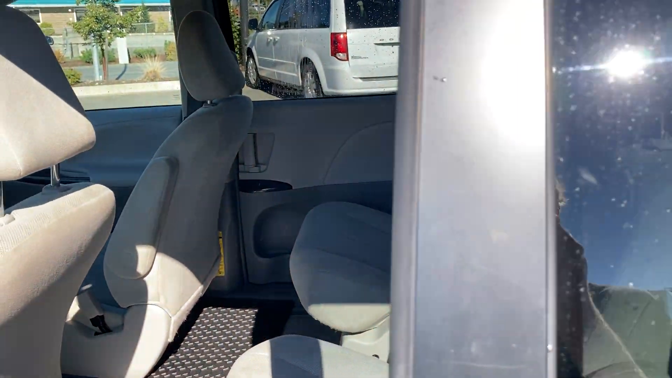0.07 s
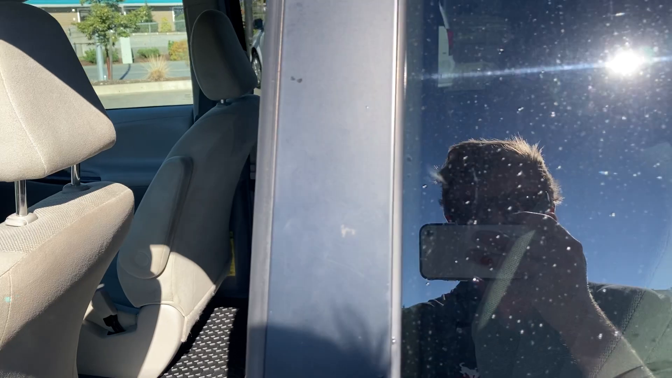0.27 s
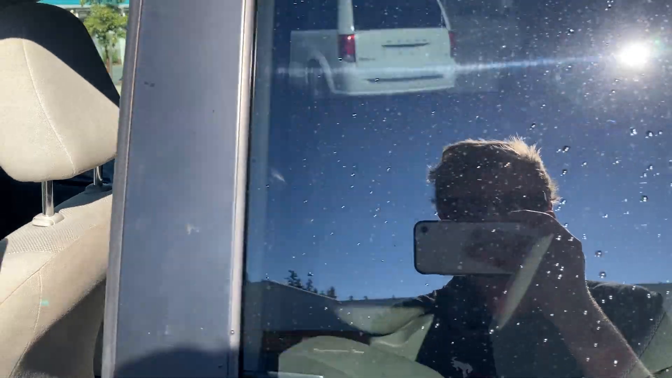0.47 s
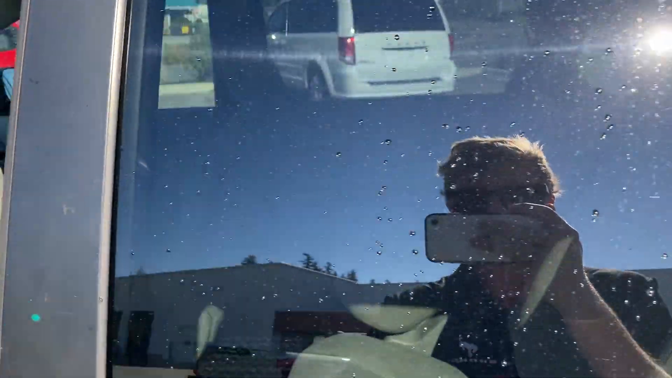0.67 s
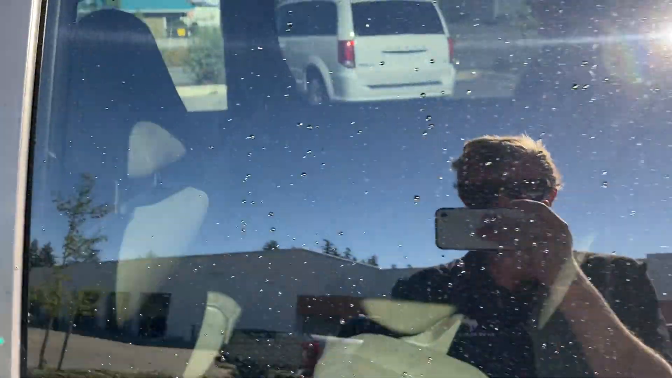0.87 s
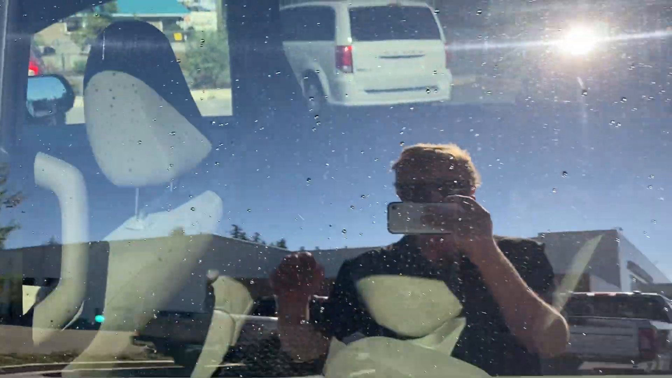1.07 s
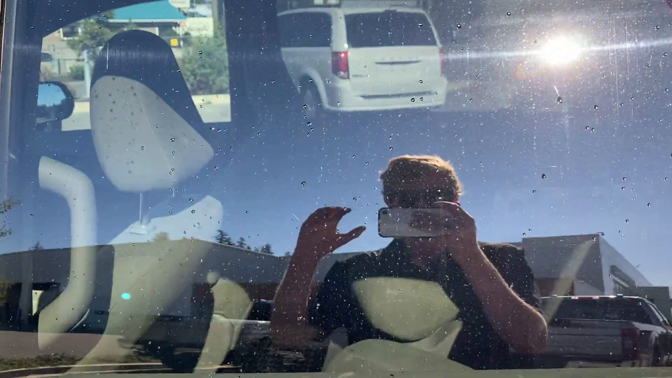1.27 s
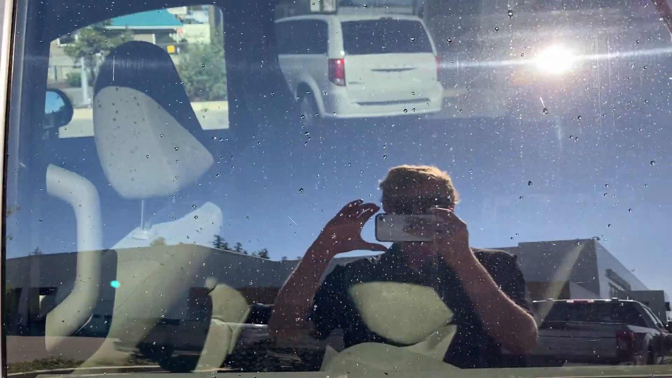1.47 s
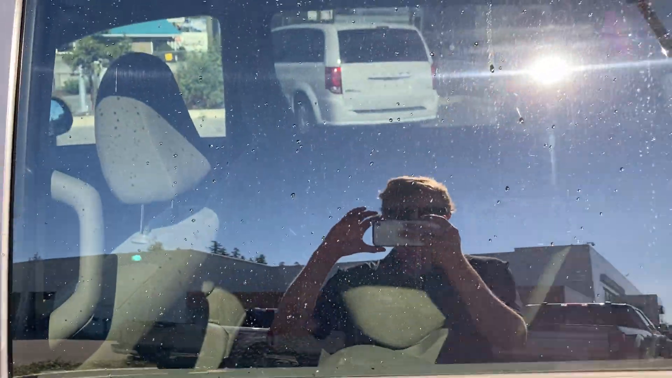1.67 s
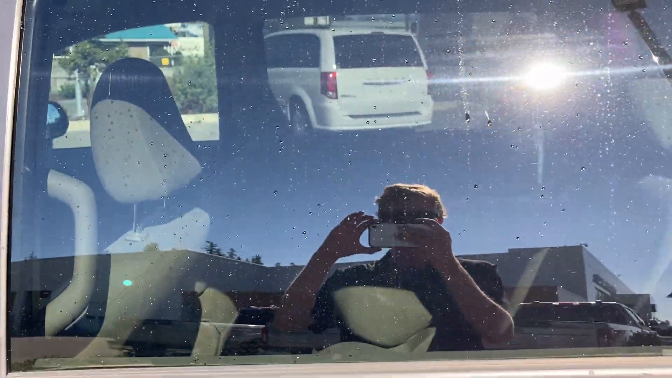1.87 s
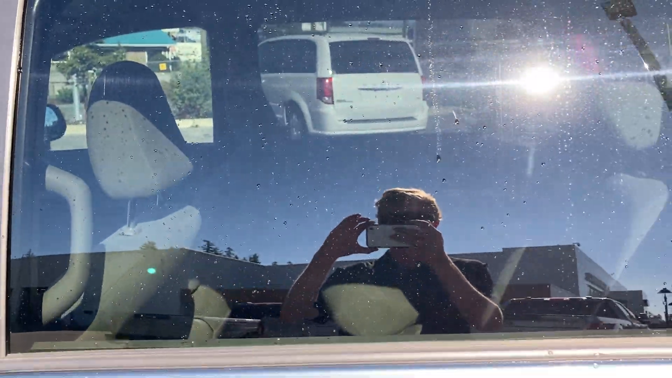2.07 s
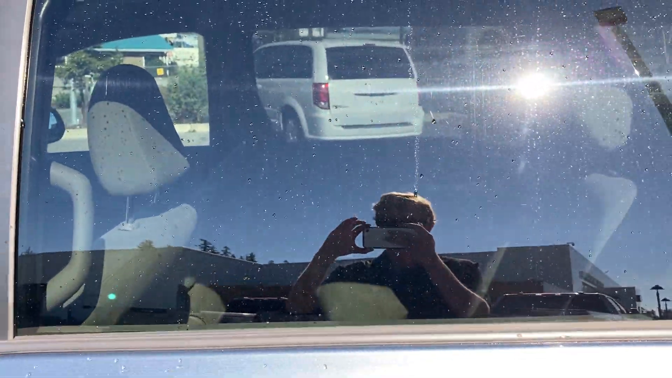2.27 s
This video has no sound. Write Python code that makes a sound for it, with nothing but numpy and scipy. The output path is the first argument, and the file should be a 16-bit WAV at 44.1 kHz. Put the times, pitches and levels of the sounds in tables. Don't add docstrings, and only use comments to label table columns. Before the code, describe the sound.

Close up outside a parked van, the sliding door rumbles and scrapes, jolts over track joints, then shuts in a loud multi-hit slam; a brief low ring dies away, leaving quiet engine and traffic hum.

```python
import sys
import numpy as np
from scipy import signal
from scipy.fft import rfft, irfft, next_fast_len
from scipy.io import wavfile
from scipy.ndimage import uniform_filter1d, map_coordinates

SR = 44100
rng = np.random.default_rng(int(sys.argv[2]) if len(sys.argv) > 2 else 0)


def waveform_to_disk(signal):
    frames = np.transpose(np.atleast_2d(signal))
    scaled = np.clip(frames, -1, 1) * 32767
    samples = np.round(scaled).astype(np.int16)
    wavfile.write(sys.argv[1], SR, samples)


def rack_gain(trim_db):
    fader = np.asarray(trim_db, float)
    return 10 ** (fader / 20)


N = 101430
T = np.arange(N) / SR

# t/s, rolling level/dB, scrape over the mean rolling level/dB
ROLL_PATH = [
    (0, -27.5, -1),
    (.14, -27.5, -1.5),
    (.27, -24.5, 1),
    (.4, -27, -0.5),
    (.6, -23.5, 0),
    (.72, -23, 0),
    (.88, -23.5, 4),
    (1.001, -22, 0.5),
    (1.11, -25, 3.5),
]
# f/Hz, level per Hz/dB
TRACK_COLOUR = [(15, -34.5), (25, -24.5), (59, -5.5), (270, -4.5), (405, -6), (1160, -24.5), (5730, -48),
                (7510, -49), (16000, -58.5)]
# f/Hz, width/Hz, gain/dB
PANEL_MODES = [(67.7, 18.6, 6), (100.8, 25, 4.5), (217.6, 77, 5.5), (266, 21, 5.5), (410, 18, 10.5),
               (583, 63, 5), (1350, 480, 3)]
# f/Hz, width/Hz, gain/dB
WHINE_MODES = [(1280, 69, 17), (1526, 120, 13)]
# f/Hz, level per Hz/dB
HUM_COLOUR = [(15, -53.5), (25, -26.5), (49, 2.5), (97, -1.5), (206, -4.5), (270, -10), (775, -11),
              (4740, -35.5), (16000, -70)]
# f/Hz, width/Hz, gain/dB
HUM_MODES = [(207.6, 38, 5), (833, 160, 8.5), (1340, 200, 8.5), (2030, 180, 5.5)]
# t/s, peak level/dB, tilt per octave/dB, t60/s
CATCH_TICKS = [
    (.294, -45.5, -7.5, 0.032),
    (0.7579, -45.5, -3, 0.013),
    (0.8462, -30.5, -7, 0.031),
    (0.957, -46, 8.5, 0.08),
    (1.1046, -53, -9.5, .03),
    (1.117, -41.5, 0, .03),
    (1.2574, -47, 7.5, .04),
]
# f/Hz, level/dB
CATCH_COLOUR = [(1200, -22), (2500, -9), (4000, -4), (5500, -8), (7400, 0), (9500, -4), (11500, -5),
                (15500, -10)]
# t/s, level/dB, ring f/Hz
JOINT_BUMPS = [
    (0.398, -15, 277),
    (0.604, -9.5, 110),
    (0.689, -22, 397),
    (0.8, -16.5, 272),
    (0.908, -7.5, 271),
    (.965, -6, 301),
    (1.058, -10.5, 292.5),
    (.96, -20, 640),
    (1.012, -21.5, 676),
    (1.04, -32, 600),
]
# t/s, clatter level/dB, tilt per octave/dB, t60/s
LATCH_STRIKES = [(.843, -36, -6, .05), (0.9556, -32, -8.5, .08), (1.140, -30.5, -9, .06),
                 (1.147, -13, -11, 0.08), (1.167, -16.5, 3.5, 0.036), (1.1716, -15, 2, 0.029),
                 (1.176, -16.5, -8.5, .06), (1.184, -22, -0.5, .05), (1.188, -15, 3, 0.06),
                 (1.2119, -12, -7.5, 0.042), (1.232, -27.5, -7.5, 0.2)]
# f/Hz, width/Hz, gain/dB
LATCH_MODES = [(664, 150, 10), (1004, 300, 13), (4540, 180, 4), (1390, 370, 12.5), (2306, 510, 10),
               (3150, 500, 8.5), (3905, 600, 9.5), (7880, 400, 4.5), (9850, 1900, 10), (11740, 500, 3)]
# f/Hz, left-right likeness/1
LATCH_ALIKE = [(200, 1.0), (1000, 0.66), (4000, 0.09)]
# t/s, level/dB, ring f/Hz
SHELL_THUDS = [
    (1.139, -7.5, 362),
    (1.148, 0, 411),
    (1.1755, -1.5, 410),
    (1.177, -12, 153.5),
    (1.192, -8, 312),
    (1.213, -11.5, 410),
    (1.224, -8, 244),
]
# f/Hz, level/dB, t60/s
SHELL_MODES = [(121.6, -12, .35), (170, -5.5, 0.35), (199.9, -4, 0.28), (250, -12, 0.338), (319, -6, 0.27),
               (440, -13, 0.28), (489.5, -7.5, 0.23), (600, -7.5, 0.18), (733, -14, .18)]
# t/s, level/dB
SEAL_BOOMS = [
    (1.144, -25),
    (1.1955, -10),
    (1.2125, -4.5),
    (1.2295, -16.5),
]
# f/Hz, level/dB, t60/s
CABIN_MODES = [(58.4, 3.5, 0.15), (100, -11.5, .42)]
# t/s, level/dB, f/Hz, t60/s
FRAME_CLANGS = [(1.146, -16.5, 79.9, .12), (1.163, -16, 167, 0.11), (1.177, -15, 103, 0.061),
                (1.232, -11, 76.2, .08), (1.272, -16, 112, 0.089), (1.302, -18, 78, .12),
                (1.146, -22.5, 1124, 0.037), (1.148, -21, 1420, 0.054), (1.149, -21, 1722, 0.052),
                (1.149, -24.5, 2220, 0.031), (1.149, -25.5, 3150, 0.033), (1.149, -31, 3700, .03),
                (1.149, -21.5, 710, 0.048), (1.169, -19, 7800, .025), (1.170, -22, 3925, .035),
                (1.172, -21, 1138, .05), (1.173, -22, 2306, .04), (1.185, -30, 3110, 0.038),
                (1.189, -24.5, 7260, 0.034), (1.193, -27, 2470, 0.031), (1.195, -27, 4090, .025),
                (1.196, -25, 1485, .03), (1.211, -18, 1380, .045), (1.217, -23, 4850, .04),
                (1.218, -19, 3160, 0.038), (1.237, -34, 1100, .03)]
# f/Hz, level/dB, t60/s
SWAY_MODES = [(49, -15, 0.61), (74.1, -13, 0.466)]
# f/Hz, left-right likeness/1
DOOR_ALIKE = [(60, 0.98), (240, 0.97), (950, 0.49), (3770, 0.13), (15000, -1.4)]
# f/Hz, left-right likeness/1
STREET_ALIKE = [(60, 1), (240, 0.82), (950, 0.3), (3770, -0.12), (15000, -0.26)]
# f/Hz, left over right level/dB
DOOR_LEAN = [(100, -1.9), (350, -1), (800, 3), (2500, 1), (6000, -3.5)]

OPPOSED = np.array([[.5], [-.5]])
ROLL_END_S, ROLL_FADE_S, PAN_START_DB = 1.15, .12, -1.5
GRIT_PER_S, GRIT_SCATTER_DB, GRIT_SHARE = 1000, 3, 0.71
SCRAPE_HZ, PANEL_SHIFT, WANDER_PER_S = 930, .06, 7
WHINE_S, WHINE_WIDTH_S, WHINE_DB = 0.28, 0.09, -46
HUM_DB, HUM_PATCH_DB, HUM_WOBBLE_DB = -33.5, 1.2, .5
LULL_S, LULL_DB, SWELL_S = 1.46, -9.5, 0.34
TRAFFIC_LOW_HZ, TRAFFIC_HIGH_HZ = 360, 2720
TICK_DB = -2
BUMP_T60_S, BUMP_RISE_S = 0.073, 0.0034
STRIKE_DB, STRIKE_RISE_S, STRIKE_HOLD_S, STRIKE_SPAN = -7.5, .003, .004, SR // 4
RATTLE_DB, RATTLE_T60_S, RATTLE_TILT_DB = -8, 0.054, -4.5
THUD_T60_S, SHELL_DB, SHELL_BLUR_RAD = 0.058, -15, 2.74
BOOM_DB, SWAY_S = -5.0, 1.2
ONE_PORT_HZ, PORT_TURN_HZ, TOP_HZ = 6950, 4520, 15800


def unit(x):
    return x / np.sqrt(np.mean(x ** 2) + 1e-20)


def noise(samples=N):
    return rng.standard_normal((2, samples))


def along(points, hz):
    f, value = np.transpose(points)
    return np.interp(np.log(hz + 1), np.log(f + 1), value)


def humps(modes, hz):
    return rack_gain(sum(db / (1 + (2 * (hz - centre) / width) ** 2) for centre, width, db in modes))


def wobble(rate):
    knots = rng.standard_normal(int(N * rate / SR) + 4)
    return map_coordinates(knots, [T * rate])


def filtered(x, response):
    size = next_fast_len(x.shape[-1] + 8192)
    hz = np.fft.rfftfreq(size, 1 / SR)
    return irfft(rfft(x, size) * response(hz), size)[..., :x.shape[-1]]


def spread(pair, gain, alike):
    def mid_side(hz):
        turn = np.arccos(np.clip(along(alike, hz), -1, 1)) / 2
        return gain(hz) * np.array([np.cos(turn), np.sin(turn)])
    mid, side = filtered(pair, mid_side)
    return np.array([mid + side, mid - side])


def rings(events, modes, rise, side_db):
    out = np.zeros((2, N))
    for s, db in events:
        for hz, mode_db, t60 in modes:
            force, offset = rng.standard_normal(2)
            span = slice(int(s * SR) + 1, int((s + 2 * t60) * SR))
            t = T[span] - s
            phase = rack_gain(side_db) * offset * hz / 400 * np.array([[1], [-1]])
            decay = rack_gain(db + mode_db + 2 * force - 60 * t / t60)
            out[:, span] += decay * (1 - np.exp(-t / rise)) * np.sin(2 * np.pi * hz * t + phase)
    return out


def burst(s, rise, hold, t60):
    t = T - s
    return np.clip(t / rise, 0, 1) * rack_gain(-60 * np.clip(t - rise - hold, 0, 2) / t60)


def rolling():
    hit = rng.random((2, N)) < GRIT_PER_S / SR
    grit = unit(hit * noise() * rack_gain(GRIT_SCATTER_DB * rng.exponential(size=(2, N))))
    drive = GRIT_SHARE * filtered(grit, lambda hz: 1 / (1 + (hz / 700) ** 2)) + noise()

    def panel(stretch):
        colour = lambda hz: rack_gain(along(TRACK_COLOUR, hz)) * humps(PANEL_MODES, hz * stretch)
        return spread(drive, colour, DOOR_ALIKE)

    load = .5 + .5 * np.tanh(2 * wobble(WANDER_PER_S))
    roll = unit(panel(1 + PANEL_SHIFT) * load + panel(1 - PANEL_SHIFT) * (1 - load))
    scrape = filtered(roll, lambda hz: 1 / (1 + (SCRAPE_HZ / (hz + 1)) ** 4))
    s, level_db, scrape_db = np.transpose(ROLL_PATH)
    body = (roll - scrape) * rack_gain(np.interp(T, s, level_db) + 0.75 * wobble(19.56))
    rub = scrape * rack_gain(level_db.mean() + np.interp(T, s, scrape_db) + 0.56 * wobble(29))
    pan_db = PAN_START_DB * np.clip(1 - T / ROLL_END_S, 0, 1) * OPPOSED
    fade_db = -60 * np.clip(T - ROLL_END_S, 0, 1) / ROLL_FADE_S
    return (body + rub) * rack_gain(pan_db + fade_db)


def hum():
    z = signal.stft(noise(), nperseg=512)[2]
    patches = uniform_filter1d(rng.standard_normal(z.shape[1:]), size=5, axis=0)
    patches = unit(uniform_filter1d(patches, size=12, axis=1))
    pair = signal.istft(z * rack_gain(HUM_PATCH_DB * patches), nperseg=512)[1][:, :N]
    colour = lambda hz: rack_gain(along(HUM_COLOUR, hz)) * humps(HUM_MODES, hz)
    air = unit(spread(pair, colour, STREET_ALIKE))
    band = lambda hz: 1 / (1 + (TRAFFIC_LOW_HZ / (hz + 1)) ** 4) / (1 + (hz / TRAFFIC_HIGH_HZ) ** 4)
    traffic = filtered(air, band)
    lull_db = LULL_DB * np.exp(-np.clip(T - LULL_S, 0, None) / SWELL_S)
    return (air - traffic + traffic * rack_gain(lull_db)) * rack_gain(HUM_DB + HUM_WOBBLE_DB * wobble(8.42))


def roller_whine():
    sing = unit(spread(noise(), lambda hz: humps(WHINE_MODES, hz) - 1, DOOR_ALIKE))
    swell = np.exp(-((T - WHINE_S) / WHINE_WIDTH_S) ** 2 / 2)
    return sing * rack_gain(WHINE_DB + 2.9 * wobble(26.7)) * swell


def ticks():
    out = np.zeros((2, N))
    for s, db, tilt_db, t60 in CATCH_TICKS:
        colour = lambda hz: rack_gain(along(CATCH_COLOUR, hz) + tilt_db * np.log2((hz + 500) / 8000))
        tone = unit(spread(noise(), colour, DOOR_ALIKE))
        out += tone * rack_gain(db + TICK_DB) * burst(s - .001, 0.0007, 0.0018, t60)
    return out


def track_bumps():
    out = np.zeros((2, N))
    for s, db, hz in JOINT_BUMPS:
        modes = [(hz, 0, BUMP_T60_S), (2.15 * hz, -24, BUMP_T60_S)]
        out += rings([(s, db)], modes, BUMP_RISE_S, -21.0)
    return out


def latch_clatter():
    out = np.zeros((2, N))
    for s, db, tilt_db, t60 in LATCH_STRIKES:
        span = slice(int(s * SR), int(s * SR) + STRIKE_SPAN)
        strike = (0, 0, burst(s, STRIKE_RISE_S, STRIKE_HOLD_S, t60))
        rattle = (RATTLE_DB, RATTLE_TILT_DB, burst(s, 0.016, 0.0074, RATTLE_T60_S))
        for extra_db, dull_db, shape in (strike, rattle):
            def colour(hz):
                tilt = rack_gain((tilt_db + dull_db) * np.log2((hz + 2000) / 3500))
                return humps(LATCH_MODES, hz) * tilt * hz / (hz + 300) / (1 + (hz / 14000) ** 4)
            tone = spread(noise(STRIKE_SPAN), colour, LATCH_ALIKE)
            level = rack_gain(db + extra_db + STRIKE_DB + 1.5 * wobble(300)) * shape
            out[:, span] += level[span] * tone
    return out


def shell_thuds():
    out = np.zeros((2, N))
    for s, db, hz in SHELL_THUDS:
        out += rings([(s, db)], [(hz, 0, THUD_T60_S)], .003, -16)
    for hz, level_db, t60 in SHELL_MODES:
        shape = sum(rack_gain(db) * burst(s, 0.0027, 0, t60) for s, db, _ in SHELL_THUDS)
        side_blur = 0.62 * hz / 400 * np.array([wobble(30.08), wobble(30)])
        phase = 2 * np.pi * hz * T + SHELL_BLUR_RAD * wobble(45) + side_blur
        out += rack_gain(level_db + SHELL_DB + 2.1 * wobble(39.91)) * shape * np.sin(phase)
    return out


def cabin_boom():
    return rings(SEAL_BOOMS, CABIN_MODES, 0.0053, -31.5) * rack_gain(BOOM_DB)


def frame_clangs():
    out = np.zeros((2, N))
    for s, db, hz, t60 in FRAME_CLANGS:
        out += rings([(s, db)], [(hz, 0, t60)], 0.0013, -27)
    return out


def door_sway():
    return rings([(SWAY_S, 0)], SWAY_MODES, .006, -32)


def scene():
    travel = rolling() + roller_whine() + ticks() + track_bumps()
    slam = latch_clatter() + shell_thuds() + cabin_boom() + frame_clangs() + door_sway()
    return filtered(travel + slam, lambda hz: rack_gain(along(DOOR_LEAN, hz) * OPPOSED)) + hum()


def band_limit(x):
    return signal.sosfilt(signal.butter(12, 16510, fs=SR, output="sos"), x)


def record(dry):
    upper = lambda hz: 1 / (1 + np.exp(np.clip((ONE_PORT_HZ - hz) / 350, -50, 50)))
    lead = lambda hz: np.exp(1j * np.pi * (hz - ONE_PORT_HZ) / PORT_TURN_HZ * np.array([[-1], [1]]))
    lows = filtered(dry, lambda hz: np.sqrt(1 - upper(hz)))
    treble = filtered(dry[[0, 0]], lambda hz: np.sqrt(upper(hz)) * lead(hz))
    mix = lows + treble
    mix = mix / (1 + np.abs(mix / .95) ** 6) ** (1 / 6)
    mix = filtered(mix, lambda hz: np.where(hz < TOP_HZ, 1, rack_gain(-35)))
    return band_limit(mix)


dry = scene()
out = record(dry)
waveform_to_disk(out)
```